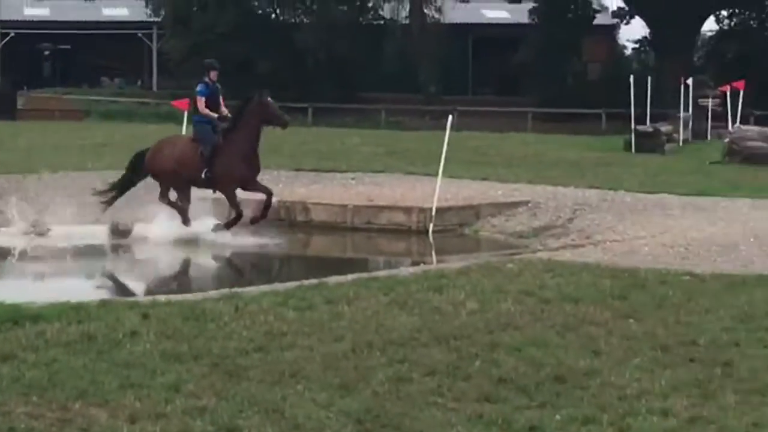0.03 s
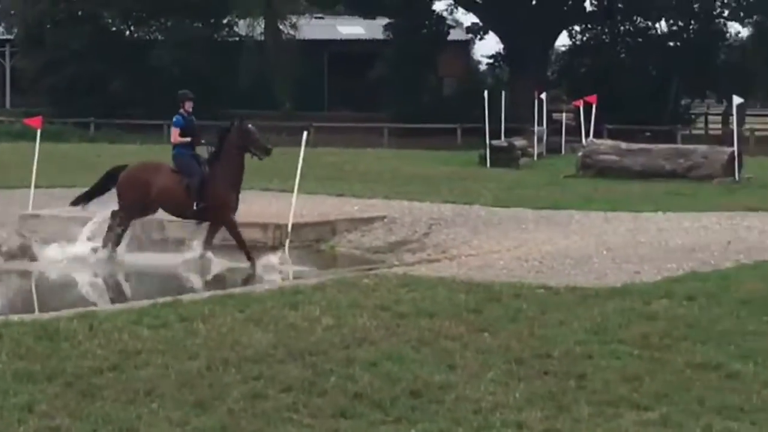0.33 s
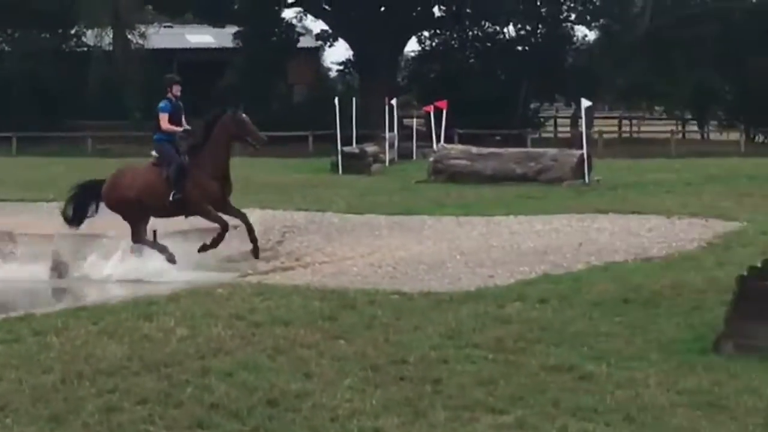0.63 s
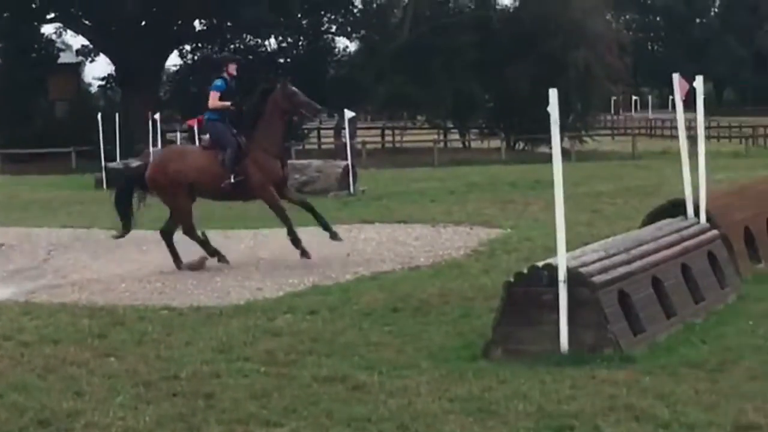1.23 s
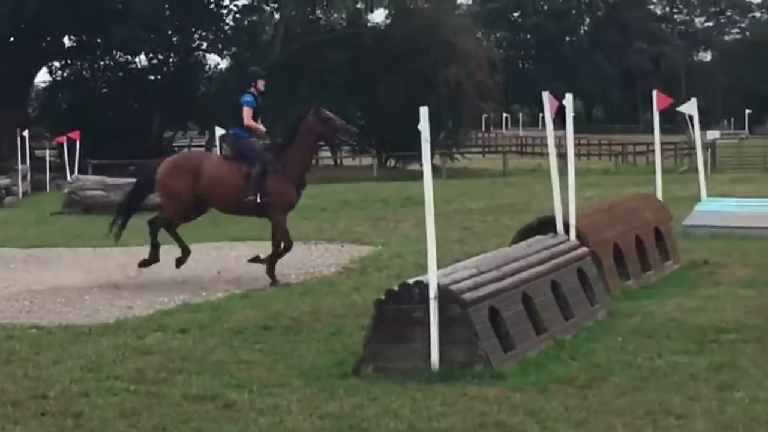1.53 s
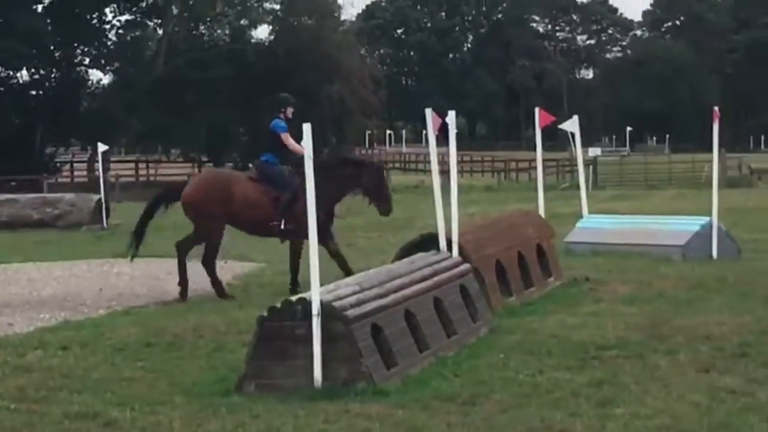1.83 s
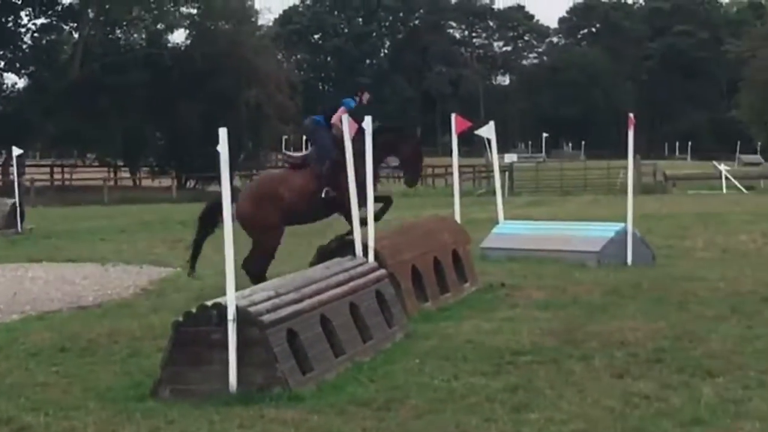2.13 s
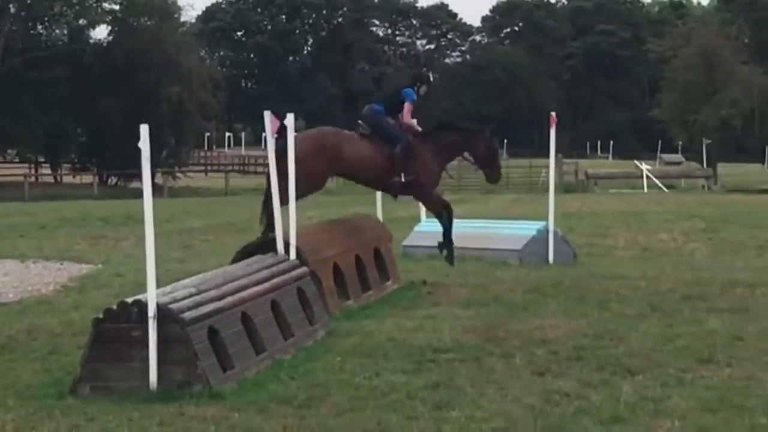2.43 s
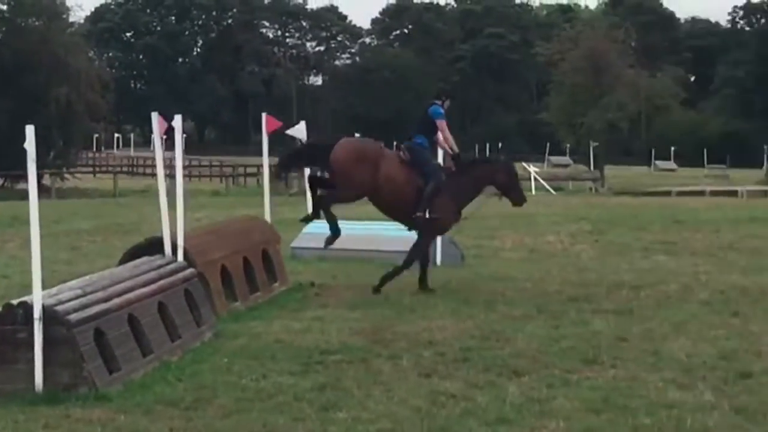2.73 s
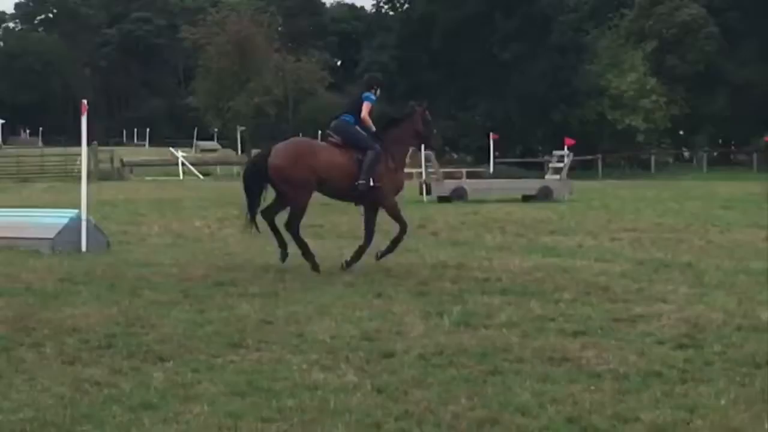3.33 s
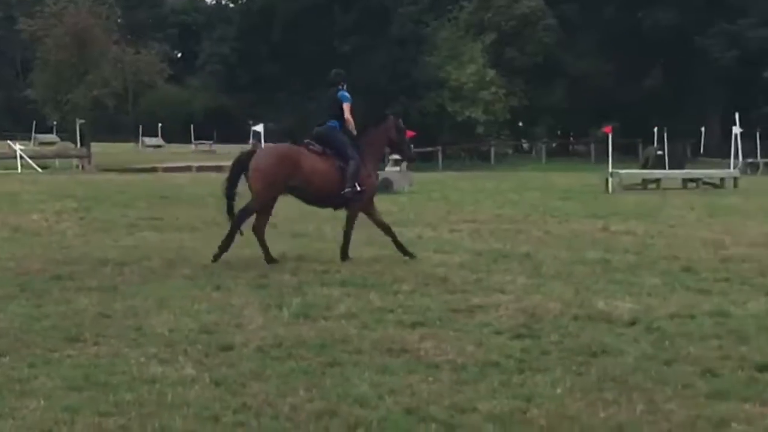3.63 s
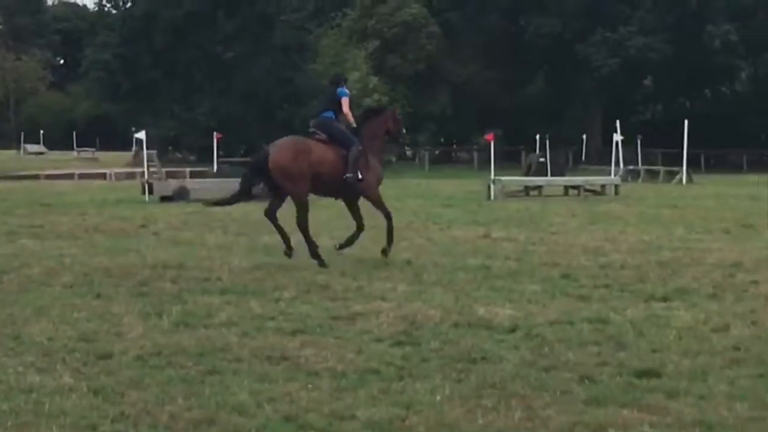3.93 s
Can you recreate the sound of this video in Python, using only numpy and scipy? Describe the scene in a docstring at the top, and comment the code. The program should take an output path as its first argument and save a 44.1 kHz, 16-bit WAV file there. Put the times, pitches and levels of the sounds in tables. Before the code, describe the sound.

A horse canters through water, splashing and spraying until the sound fades by about 2 seconds, while wind buffets the microphone for the first 0.7 seconds. Hooves crunch wet gravel from 0.6 to 2 seconds, then thud on turf from 1.5 seconds onward, with light clicks and buckle clinks. A small bird whistles faintly around 2 seconds and near the end. One dry hoof knock comes at 3.6 seconds.

```python
"""A horse canters out of a water jump, crosses wet gravel, leaps a log fence and canters off over turf.
Its legs churn up bubbles and spray that falls back as drops; its hooves crunch stones, then thud on soil.
Leather clicks, buckles clink, one hoof knocks another and soft rushes of air follow the last strides.
A gust buffets the microphone at first and dies down to a low rumble over the open field,
where a small bird whistles."""
import sys
import numpy as np
from scipy import signal
from scipy.fft import rfft, irfft
from scipy.io import wavfile

SR = 44100
rng = np.random.default_rng(int(sys.argv[2]) if len(sys.argv) > 2 else 0)


def waveform_to_disk(signal):
    """Save audio, clipped to [-1, 1], as 16-bit WAV at the path in sys.argv[1]."""
    frames = np.transpose(np.atleast_2d(signal))
    scaled = np.clip(frames, -1, 1) * 32767
    samples = np.round(scaled).astype(np.int16)
    wavfile.write(sys.argv[1], SR, samples)


N = 176400
TIME = np.arange(N) / SR

# how loud the water is (time [s], churning level [dB], falling spray level [dB])
WATER_LEVELS = [(.03, -54, -52), (.085, -45.5, -39.5), (.13, -51, -46.5), (.2, -52.5, -42.5),
                (.27, -57.5, -49), (.41, -45.5, -43.5), (.48, -48, -49), (.59, -52.5, -44.5),
                (.75, -50, -42), (.85, -48, -45.5), (1, -53, -48.5), (1.1, -51, -45.5), (1.25, -54.5, -54),
                (1.5, -55.5, -56), (1.72, -61, -58.5), (2.05, -65, -63.5), (2.4, -76, -74)]
# tone of the churning water (frequency [Hz], relative level [dB])
CHURN_TONE = [(200, -4.5), (450, -2), (1700, -0.5), (3000, -7), (4500, -10), (8000, -33)]
# tone of the spray, also used for grit and rustle (frequency [Hz], relative level [dB])
SPRAY_TONE = [(800, -16.5), (2000, -1), (3200, -1.5), (4700, -5.5), (6400, 5), (8000, -1.5), (11400, 1.5)]
DROPS_PER_S, DROP_SPREAD_DB, WATER_FLUTTER_DB = 7700, 2, 2
BUBBLE_DB, SPATTER_DB = -6.5, -7.5
def splash():
    """The legs churn the water into bubbles, and spray patters back with larger drops ringing in it."""
    bubbles = undb(BUBBLE_DB) * pings(hz=1430, spread_octaves=0.701, cycles=5.5, count=1400)
    churn = colour(grains(DROPS_PER_S, DROP_SPREAD_DB), CHURN_TONE) + bubbles
    spatter = undb(SPATTER_DB) * pings(hz=5130, spread_octaves=0.701, cycles=8.1, count=1100)
    spray = colour(grains(DROPS_PER_S, DROP_SPREAD_DB) + spatter, SPRAY_TONE)
    water = unit(churn) * curve(WATER_LEVELS) + unit(spray) * curve(WATER_LEVELS, column=2)
    return water * undb(WATER_FLUTTER_DB * wander(25))


def pings(hz, spread_octaves, cycles, count, spread_db=2):
    """Drops and bubbles ring briefly, each at its own pitch and gliding upwards."""
    out, age = np.zeros(N + SR), np.arange(SR // 20) / SR
    starts = rng.integers(0, N, count)
    pitches = np.clip(rng.standard_normal(count), -2, 2)
    sizes = np.minimum(rng.exponential(size=count), 4)
    for start, pitch, size in zip(starts, pitches, sizes):
        turns = age * hz * 2 ** (spread_octaves * pitch)
        ring = np.sin(2 * np.pi * turns * (1 + 0.0035 * turns)) * np.exp(-turns / cycles)
        out[start:start + len(age)] += undb(spread_db * size) * ring
    return unit(out[:N])


# steps on wet gravel (time [s], fade time [s], crunch level [dB], grit level [dB])
GRAVEL_HOOVES = [(0.574, 0.065, -39.5, -46), (0.705, 0.018, -43, -35.5), (0.906, 0.02, -33.5, -37.5),
                 (1.011, 0.0088, -33.5, -40), (1.035, 0.0068, -36, -54), (1.348, 0.022, -38.5, -40),
                 (1.374, 0.028, -38, -58), (1.491, 0.006, -42, -34), (1.5, 0.013, -35.5, -44),
                 (1.585, 0.018, -55, -47), (1.669, 0.029, -45.5, -48), (1.853, 0.025, -54.5, -47),
                 (1.942, 0.006, -42.5, -48), (1.975, 0.013, -48, -48.5)]
# tone of grinding stones (frequency [Hz], relative level [dB])
CRUNCH_TONE = [(80, 10), (190, 2.5), (320, -6), (600, 0), (1400, -4), (2600, -11), (4500, -15.5),
               (10000, -41)]
GRAINS_PER_S, GRAIN_SPREAD_DB = 2300, 0.5
def gravel():
    """Each hoof grinds the stones together and scatters wet grit."""
    crunch = colour(grains(GRAINS_PER_S, GRAIN_SPREAD_DB), CRUNCH_TONE)
    grit = colour(grains(GRAINS_PER_S, GRAIN_SPREAD_DB), SPRAY_TONE)
    out = 0
    for at, fade, crunch_db, grit_db in GRAVEL_HOOVES:
        out += burst(at, fade, rise_s=0.0027) * (undb(crunch_db) * crunch + undb(grit_db) * grit)
    return out


# steps on turf; the row at 2.9 s is the ground still ringing after the step before it (time of peak [s], level
# [dB], pitch [Hz], rise and fade time [s])
TURF_HOOVES = [(1.512, -36, 129, 0.0081), (1.945, -39.5, 147, 0.0069), (2.09, -42.5, 171, 0.01),
               (2.288, -29, 153.5, 0.012), (2.527, -34, 71, 0.016), (2.545, -41, 167, 0.013),
               (2.776, -34.5, 153, 0.0057), (2.835, -29, 138, 0.0087), (2.9, -48, 114, .012),
               (3.01, -44, 111, 0.018), (3.172, -35, 176, 0.002), (3.19, -32, 140.6, 0.014),
               (3.728, -37.5, 170, 0.01), (3.77, -40.5, 169, 0.011)]
def turf():
    """The ground booms for a few uneven cycles under each hoof, with a dull scuff of soil."""
    soil = undb(-16) * wander(348)
    wobble = 0.6 * wander(70)  # pushes the wave a little early or late
    out = 0
    for at, db, hz, fade in TURF_HOOVES:
        age = TIME - at
        boom = np.cos(2 * np.pi * hz * age + wobble)
        loudness = np.exp(-np.minimum(abs(age / fade), 20) ** 1.12)
        out += undb(db) * loudness * (boom + soil)
    return out


# ringing notes of a struck hoof (pitch [Hz], level [dB], time to fade by 60 dB [s])
HOOF_NOTES = [(650, -41, 0.025), (980, -38, .015), (1380, -37, 0.014), (1770, -39, 0.012)]
def hoof_knock(at_s=3.6072):
    """A hind hoof clips a front one in mid-stride: a dry, woody knock of horn."""
    age = np.maximum(TIME - at_s, 0)
    out = 0
    for k, (hz, db, fade) in enumerate(HOOF_NOTES):
        direction = (-1) ** k  # neighbouring notes start by swinging opposite ways
        out += direction * undb(db - 60 * age / fade) * np.sin(2 * np.pi * hz * age)
    return out


# sharp clicks (time [s], fade time [s], tick level [dB], knock level [dB])
CLICK_HITS = [(0.043, 0.002, -50, -40.5), (0.188, 0.0021, -24, -26), (0.347, 0.0035, -38.5, -43),
              (0.3877, 0.0041, -32, -43), (0.388, 0.0021, -35.5, -25.5), (0.57, 0.0048, -37.5, -42),
              (0.793, 0.0055, -34.5, -61), (2.372, 0.0012, -45, -63), (2.759, 0.0076, -45.5, -50.5),
              (2.773, 0.0081, -56, -58), (2.831, 0.0089, -57, -61), (2.955, 0.014, -58, -56),
              (3.054, 0.0065, -52.5, -59), (3.189, 0.0098, -54, -56), (3.359, 0.0055, -58.5, -49),
              (3.6072, 0.0011, -44.5, -49), (3.723, 0.013, -53.5, -59)]
# tone of the bright tick, also used for grass (frequency [Hz], relative level [dB])
TICK_TONE = [(700, -74), (2500, 7.5), (4700, 1), (6400, 7), (8200, 0), (10800, 2.5), (12500, -3)]
# tone of the hollow knock (frequency [Hz], relative level [dB])
KNOCK_TONE = [(200, 1), (400, -1), (650, 9), (1000, 0.5), (1600, 5.5), (2600, -6), (5000, -26),
              (12000, -49)]
def clicks():
    """Leather, flung drops and grit make tiny hard hits: a bright tick over a hollow knock."""
    tick, knock = 0, 0
    for at, fade, tick_db, knock_db in CLICK_HITS:
        hit = burst(at, fade, rise_s=0.00027)
        tick += undb(tick_db) * hit
        knock += undb(knock_db) * hit
    return colour(tick * noise(), TICK_TONE) + colour(knock * noise(), KNOCK_TONE)


# metal parts touching (time [s], fade time [s], level [dB])
BUCKLE_HITS = [(1.79, 0.0027, -39), (1.832, 0.0029, -39), (2.029, 0.0023, -50), (2.199, 0.0042, -39),
               (2.892, 0.0015, -44), (3.109, 0.0022, -43.5), (3.122, 0.0013, -40), (3.485, .0025, -52)]
# tone of the metal (frequency [Hz], relative level [dB])
METAL_TONE = [(900, -26), (4600, -5), (6100, -4), (7600, -8), (11000, -1)]
def buckles():
    """The bit and buckles clink: thin metal hits with hardly any body."""
    hits = sum(undb(db) * burst(at, fade, rise_s=0.00023) for at, fade, db in BUCKLE_HITS)
    return colour(hits * noise(), METAL_TONE)


# rushes of air (time [s], length [s], air level [dB], rustle level [dB], rasp pitch [Hz], rasp level [dB])
STRIDE_RUSHES = [(2.51, 0.097, -57, -65, 2450, -71), (3.001, 0.26, -63.5, -61, 2860, -66.5),
                 (3.346, 0.14, -59, -76, 4300, -74.5)]
# tone of the rushing air (frequency [Hz], relative level [dB])
RUSH_TONE = [(250, -3), (550, 6), (1300, 2.5), (2100, -1.5), (3100, -8.5), (3800, -13), (6000, -29)]
def rushes(rasp_width_hz=460):
    """Air and grainy rustle swell softly as the horse lands and strides on, each time with a rasp."""
    air = colour(noise(), RUSH_TONE)
    rustle = colour(grains(GRAINS_PER_S, GRAIN_SPREAD_DB), SPRAY_TONE)
    low_noise = wander(rasp_width_hz) + 1j * wander(rasp_width_hz)
    out = 0
    for at, length, air_db, rustle_db, hz, rasp_db in STRIDE_RUSHES:
        rasp = np.real(low_noise * np.exp(2j * np.pi * hz * TIME))  # noise moved up to the pitch
        out += swell(at, length) * (undb(air_db) * air + undb(rustle_db) * rustle + undb(rasp_db) * rasp)
    return out


# how the gust dies down (time [s], relative level [dB])
GUST_LEVELS = [(0, -18), (.06, -26.5), (.105, -25.5), (.17, -21.5), (.36, -24), (.46, -28), (.62, -28),
               (.8, -40.5), (1.02, -41.5), (1.25, -52), (1.6, -45.5), (1.78, -53.5), (2.1, -49),
               (2.45, -49), (2.9, -43.5), (3.38, -55.5), (3.54, -45.5), (4, -46.5)]
# tone of the rumble (frequency [Hz], relative level [dB])
WIND_TONE = [(20, -48), (32, -9), (48, 2), (76, 4), (105, -5.5), (150, -3.5), (230, -14.5), (340, -25),
             (520, -38), (1500, -69)]
# swirls of air hitting the microphone (time [s], level [dB], pitch [Hz])
SWIRLS = [(0.016, -12.5, 185), (0.048, -9.5, 135), (0.088, -23.5, 300), (0.169, -15, 146),
          (.188, -14.5, 137), (0.212, -20, 217), (.224, -9.5, 138), (0.249, -20.5, 129), (0.279, -11, 123),
          (0.294, -19, 152), (.315, -20, 216), (0.354, -17.5, 143), (.379, -20, 128), (0.393, -18, 237),
          (0.43, -16.5, 169), (0.478, -20.5, 92), (0.507, -22.5, 123), (.538, -24, 110), (0.586, -22, 185),
          (.613, -25.5, 95), (0.712, -30.5, 77)]
# tone of each swirl's rough edge (frequency [Hz], relative level [dB])
RUFFLE_TONE = [(90, -13.5), (250, 7.5), (450, -2), (650, -20), (3000, -67)]
WIND_DB, WIND_FLUTTER_DB = -3, 1.5
THUMP_CYCLES, RUFFLE_DB, RUFFLE_S = 0.38, -17.5, 0.0028
def wind():
    """A gust rumbles on the microphone, with single rough-edged swirls thumping through it."""
    out = colour(noise(), WIND_TONE) * curve(GUST_LEVELS)
    out *= undb(WIND_DB + WIND_FLUTTER_DB * wander(36))
    ruffle = undb(RUFFLE_DB) * colour(noise(), RUFFLE_TONE)
    for at, db, hz in SWIRLS:
        age = TIME - at
        cycles = age * hz
        thump = -np.cos(2 * np.pi * cycles) / (1 + (cycles / THUMP_CYCLES) ** 2 / 2) ** 2
        edge = ruffle / (1 + (age / RUFFLE_S) ** 2 / 2)
        out += undb(db) * (thump + edge)
    return out


# whistles (time [s], length [s], start pitch [Hz], end pitch [Hz], level [dB])
BIRD_NOTES = [(1.828, 0.088, 3900, 3110, -70), (2.117, 0.027, 5450, 5670, -65),
              (2.136, 0.0256, 5400, 4370, -64), (2.165, 0.032, 4300, 4380, -59.5),
              (2.192, 0.031, 4210, 3720, -58.5), (2.279, 0.1, 5120, 4220, -63.5),
              (2.396, 0.021, 5500, 5300, -69), (3.875, 0.063, 5500, 5860, -72),
              (3.944, .06, 6160, 5800, -69)]
BIRD_FLUTTER_DB, ECHO_DB, ECHO_S = 3, -6.5, 0.068
def bird():
    """A small bird gives thin, mostly falling whistles, smeared by echoes from trunks and leaves."""
    waver = 1 + 0.019 * wander(440)
    song = 0
    for at, length, start_hz, end_hz, db in BIRD_NOTES:
        remaining = 1 - np.clip((TIME - at) / length, 0, 1)
        hz = (end_hz + (start_hz - end_hz) * remaining ** 1.8) * waver  # slides fast, then settles
        song += undb(db) * swell(at, length) * np.sin(2 * np.pi * np.cumsum(hz) / SR)
    song *= undb(BIRD_FLUTTER_DB * wander(130))
    trees = noise() * np.exp(-TIME / ECHO_S)
    echo = signal.fftconvolve(song, trees / np.linalg.norm(trees))[:N]
    return song + undb(ECHO_DB) * echo


# tone of distant air in the trees (frequency [Hz], relative level [dB])
FIELD_TONE = [(25, -19), (60, -2.5), (160, 6.5), (260, -2), (380, -6.5), (560, -7), (950, -7.5),
              (1900, -18), (3200, -28), (4900, -30), (6200, -28.5), (8100, -34), (11200, -27.5),
              (12500, -57)]
FIELD_DB, CRACKLE_DB = -55, -76.5
def field():
    """Nearly steady outdoor air with a faint crackle of grass and grit."""
    air = colour(noise(), FIELD_TONE) * undb(FIELD_DB + wander(4))
    crackle = colour(grains(per_s=400, spread_db=3.2), TICK_TONE)
    return air + undb(CRACKLE_DB) * crackle


def undb(db):
    """Turn decibels into a number to multiply by."""
    return 10 ** (np.asarray(db) / 20)


def unit(x):
    """Scale a signal to an average power of 1."""
    return x / np.sqrt(np.mean(x ** 2))


def curve(table, column=1):
    """Loudness over time, joining the dots of one dB column of a table."""
    rows = np.array(table)
    return undb(np.interp(TIME, rows[:, 0], rows[:, column]))


def colour(x, tone):
    """Filter a sound to follow a tone table; white noise keeps its power."""
    hz, db = np.array(tone).T
    log_hz = np.log(np.fft.rfftfreq(N, 1 / SR) + 1)
    gain = unit(undb(np.interp(log_hz, np.log(hz), db)))
    # these steps make the filter ring after a hit instead of before it
    cepstrum = irfft(np.log(gain), N)
    cepstrum[1:N // 2] *= 2
    cepstrum[N // 2 + 1:] = 0
    return irfft(rfft(x) * np.exp(rfft(cepstrum)), N)


def noise():
    """White noise: an even hiss."""
    return rng.standard_normal(N)


def wander(hz):
    """A smooth random wiggle of typical size 1, changing at up to about this rate."""
    smoothing = np.exp(-(np.fft.rfftfreq(N, 1 / SR) / hz) ** 2)
    return unit(irfft(rfft(noise()) * smoothing, N))


def grains(per_s, spread_db):
    """Many tiny hits at random times, a few stronger than the rest."""
    size = undb(spread_db * np.minimum(rng.exponential(size=N), 6))
    hits = rng.random(N) < per_s / SR
    return unit(hits * size * np.sign(noise()))


def burst(start, fade, rise_s):
    """Loudness that jumps up and dies away."""
    age = np.maximum(TIME - start, 0)
    return np.minimum(age / rise_s, 1) * np.exp(-np.minimum(age / fade, 20) ** 1.15)


def swell(start, length):
    """Loudness that rises and falls in a rounded arch."""
    progress = np.clip((TIME - start) / length, 0, 1)
    return 2 * np.sqrt(progress * (1 - progress))


def scene():
    """The horse and its surroundings at one microphone."""
    horse = splash() + gravel() + turf() + hoof_knock() + clicks() + buckles() + rushes()
    return (horse + wind() + bird() + field())[None]


def record(dry, bottom_hz=31, top_hz=12050):
    """Cut away the deepest bass and the highest treble."""
    bass_cut = signal.butter(3, bottom_hz, "high", fs=SR, output="sos")
    treble_cut = signal.ellip(10, .2, 70, top_hz, fs=SR, output="sos")
    return signal.sosfilt(treble_cut, signal.sosfilt(bass_cut, dry))


dry = scene()
out = record(dry)
waveform_to_disk(out)
```